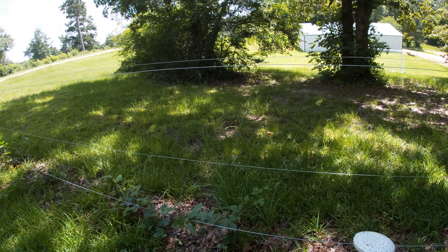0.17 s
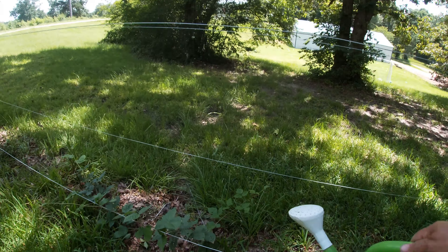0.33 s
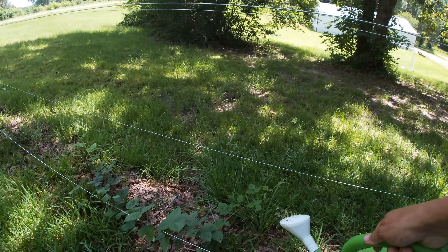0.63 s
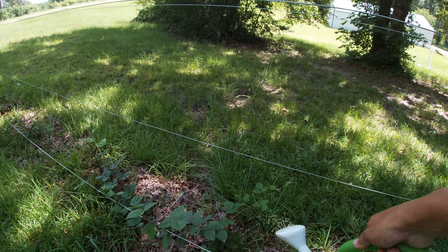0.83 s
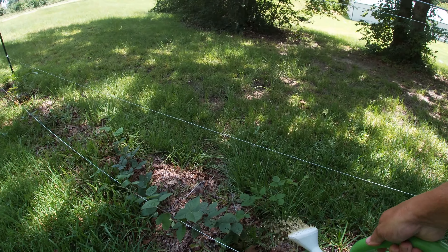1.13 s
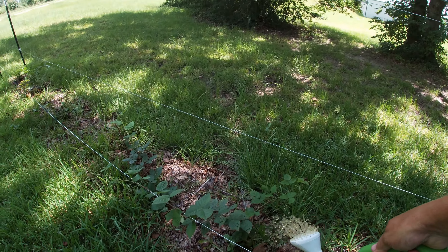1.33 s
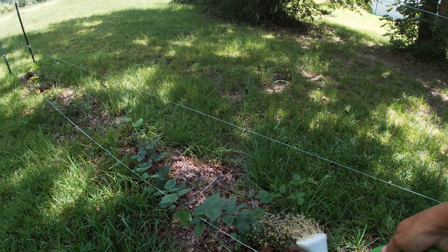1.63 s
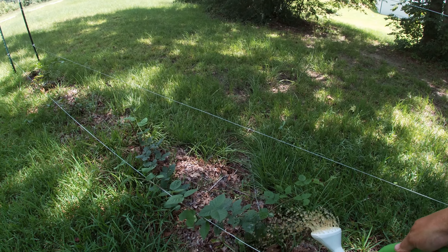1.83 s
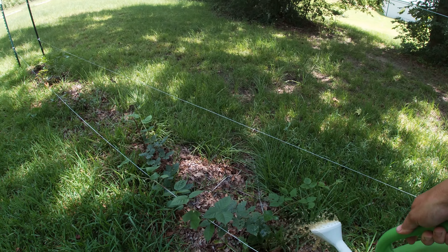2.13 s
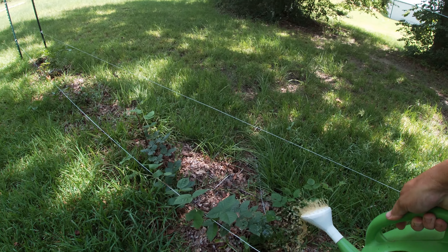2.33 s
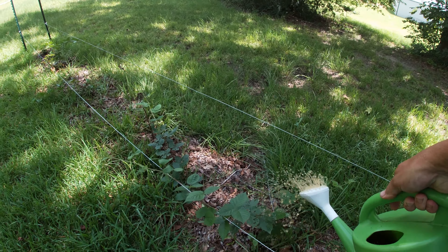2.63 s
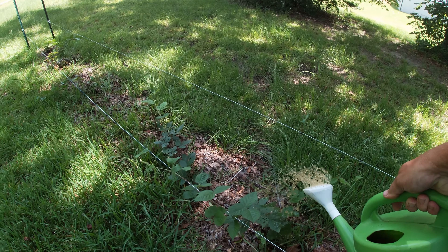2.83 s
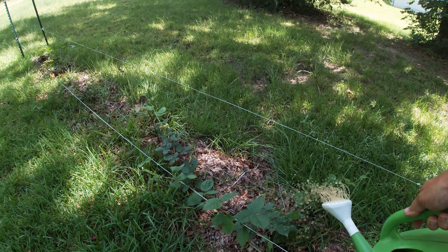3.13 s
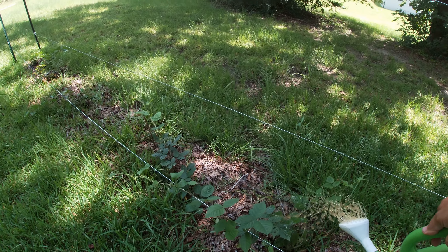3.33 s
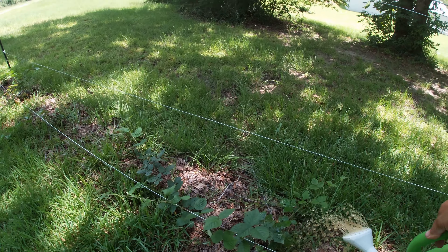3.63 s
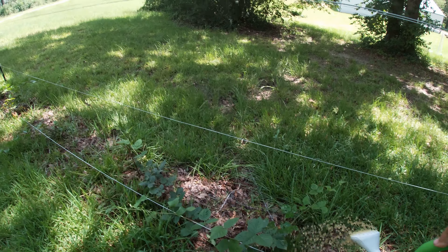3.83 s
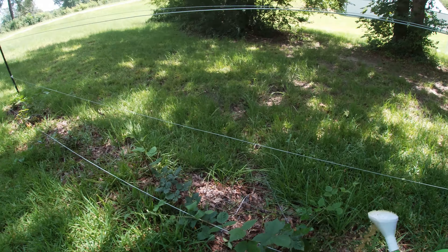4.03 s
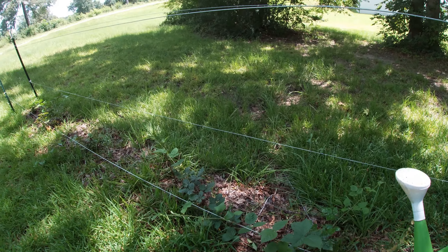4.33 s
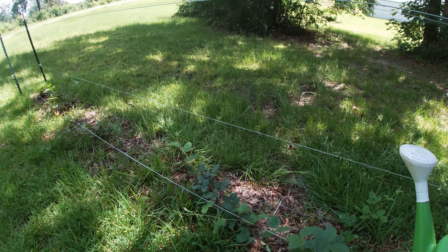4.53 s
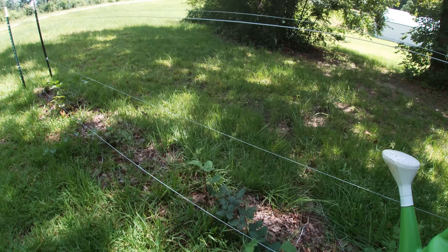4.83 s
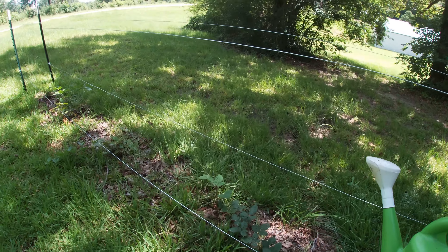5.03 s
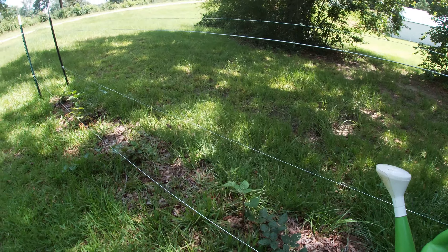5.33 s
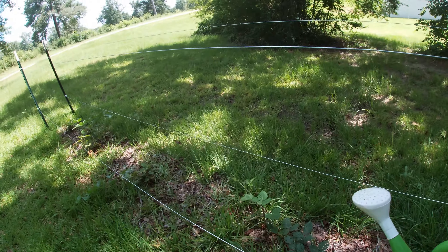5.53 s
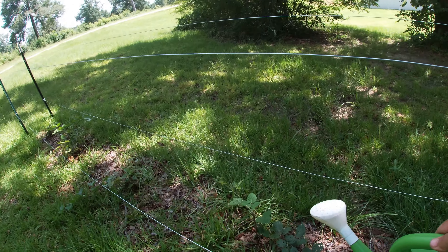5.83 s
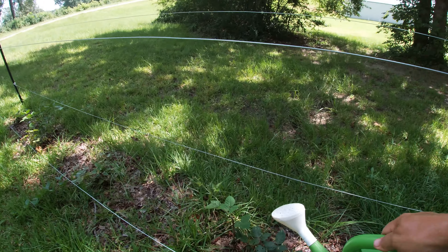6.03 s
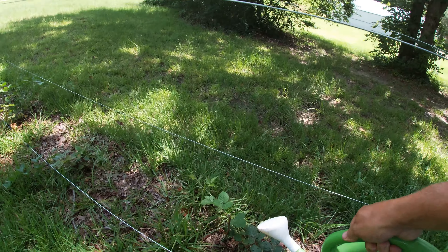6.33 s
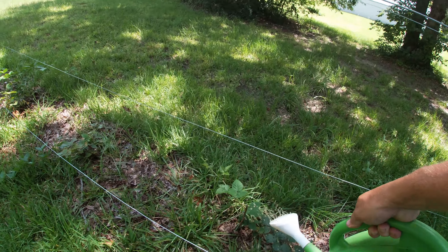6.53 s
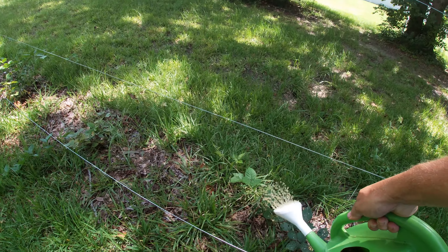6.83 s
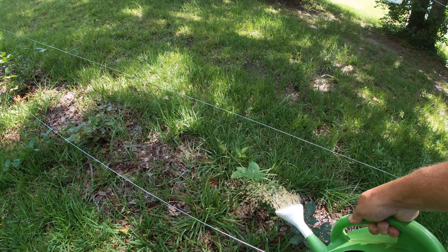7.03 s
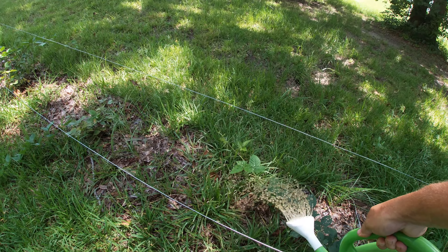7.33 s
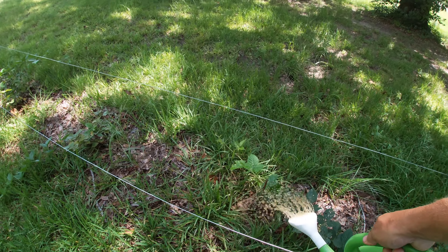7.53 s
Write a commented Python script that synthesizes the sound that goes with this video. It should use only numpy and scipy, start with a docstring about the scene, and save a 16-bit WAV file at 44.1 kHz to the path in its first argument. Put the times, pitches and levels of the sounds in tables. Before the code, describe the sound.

A plastic watering can patters water over grass and leaves with hollow gurgles, sloshes loudly when tipped upright, then knocks and pours again over a distant engine.

```python
"""A breeze, a distant engine and the summer hiss of a garden last throughout, as noise and sine orders.
First a plastic can sprinkles grass and low plants, in random impacts; air gurgles in as ringing bubbles.
At 4.6 s the can is tipped upright: the wet plastic squeaks, and waves boom and splash inside it.
At 5.5 s a gust of shaped noise buffets the microphone, then a small bird chirps a rising sine.
At 6.2 s knocks ring the can wall as it is tipped again, and the pouring and gurgling resume."""
import sys
import numpy as np
from scipy import signal
from scipy.fft import rfft, irfft
from scipy.io import wavfile
from scipy.ndimage import uniform_filter1d

SR = 44100
rng = np.random.default_rng(int(sys.argv[2]) if len(sys.argv) > 2 else 0)


def pcm_store(signal):
    """Save signal as 16-bit PCM."""
    levels = np.round(np.clip(np.atleast_2d(signal), -1, 1) * 32767)
    wavfile.write(sys.argv[1], SR, levels.astype(np.int16).T)


N = 338688
TIME = np.arange(N) / SR

# Every *_COLOUR table is a relative spectrum: frequency_hz, level_db.
# puffs of wind on the microphone: peak_s, level_db, swell_s, decay_s, corner_hz, fall_db_per_octave
PUFFS = [(0.013, -37, .01, 0.012, 40.3, 41), (1.36, -43, .025, .035, 40.2, 31),
         (5.362, -29, 0.013, 0.15, 89.5, 9), (5.462, -11, 0.0056, 0.016, 195, 12),
         (5.484, -15.5, 0.011, 0.056, 138, 15.5), (5.549, -12.5, 0.0046, 0.01, 185, 19.5),
         (5.586, -16, 0.026, 0.012, 160, 23.5), (5.712, -19.5, 0.0083, 0.02, 172, 17),
         (5.748, -15.5, 0.013, 0.018, 94, 16.5)]
BREEZE_COLOUR = [(10, 0), (25, -11), (48, 2), (80, -16), (200, -25), (600, -84)]
BREEZE_DB, BREEZE_SWING_DB = -62.5, 0.5   # the light breeze between puffs
GUST_S, GUST_DB, GUST_SWELL_S, GUST_DECAY_S = 5.5, -33, 0.045, 0.13   # the gust that carries the puffs
# level of the distant engine: time_s, level_db
ENGINE_LEVEL = [(0, -53), (.9, -65.5), (1.5, -54.5), (2.65, -52), (4.4, -49.5), (5.2, -56.5), (6.6, -55),
                (7.68, -52.5)]
# sine components of the engine: multiple_of_firing_rate, relative_level_db
ENGINE_ORDERS = [(1, -2.5), (1.601, -10.5), (2, -14.5), (3, -17.5), (4, -20)]
ENGINE_RUMBLE_COLOUR = [(30, -27), (60, -5), (80, -1), (105, -7.5), (160, -2.5), (230, -7), (400, -15),
                        (1200, -51)]
FIRING_HZ = 75.4
# still garden air, insects and far leaves
GARDEN_COLOUR = [(20, -5), (80, -12), (170, 2.5), (240, -24.5), (360, -15.5), (700, -15), (1100, -16.5),
                 (1320, -14), (1950, -45.5), (2600, -17.5), (4000, -14.5), (6500, -16.5), (8700, -25.5),
                 (9800, -21), (11000, -37), (15500, -82)]
GARDEN_DB = -54

# strength of the shower from the rose in each pour: time_s, level_db
FIRST_POUR = [(0.65, -60), (0.76, -62.5), (1.01, -51.5), (1.32, -60.5), (1.33, -50.5), (2.46, -52),
              (3.08, -48.5), (3.19, -44), (3.5, -54), (3.8, -47), (4.51, -53), (4.55, -50)]
SECOND_POUR = [(6.26, -93), (6.55, -66), (6.896, -57.5), (6.912, -52), (7.018, -55), (7.184, -53),
               (7.68, -50.5)]
# the rose dribbles beneath and between the pours: time_s, level_db
DRIBBLE = [(0.7, -73), (5.6, -69), (6.05, -61), (6.27, -71)]
# where the shower lands: time_s, share_on_broad_leaves (0-1)
AIM = [(1.0, 0.35), (1.4, 0.64), (2.6, 0.3), (2.9, 0.93), (3.35, 0.9), (3.7, 0.3), (6.7, 0.16), (7.0, 0.9),
       (7.68, 0.77)]
# drops on grass, broad leaves and soil
GRASS_COLOUR = [(900, -35), (1500, -7.5), (2000, -7.5), (2520, -5.5), (2950, -6.5), (4000, -5), (5000, -15),
                (7000, -11), (9000, -13.5), (9900, -9.5), (11200, -27.5), (12500, -21), (14500, -28),
                (15700, -84)]
LEAVES_COLOUR = [(1500, -13.5), (2900, -30), (3300, -3.5), (3900, 0.5), (4600, 2.5), (5200, 6.5), (6200, 5),
                 (7200, -8), (8000, -5), (8800, 1), (10000, -13.5), (11300, -25), (12400, -13),
                 (15500, -42)]
SOIL_COLOUR = [(150, -7), (300, -4.5), (750, 2.5), (1150, -5.5), (1700, 2), (2000, -2.5), (2400, 3.5),
               (2850, -4), (3600, -28), (6000, -31.5)]
# leaves that ring under the drops: pitch_hz, width_hz, relative_level_db
LEAF_MODES = [(1720, 300, -6), (2390, 510, 4.5), (3280, 120, -2), (4430, 360, -31), (5020, 270, 7.5),
              (5470, 130, -3.5), (5170, 990, 6), (8900, 350, 3.5), (9100, 1000, 4)]
FULL_FLOW_DB = -48.5   # a steady pour
SOIL_DB = -51   # splash on open soil at full flow
SOIL_FOLLOWS, LEAF_SHELTER_DB = 0.77, 1.5   # power of the flow; loss when all lands on leaves
# the clearest tiny bubbles on wet leaves: start_s, level_db, pitch_hz
TINKLES = [(0.208, -31.5, 4900), (0.857, -39, 5200), (1.094, -46, 5240), (1.116, -33, 5060),
           (1.299, -37, 5460), (1.36, -37, 5960), (1.412, -40, 5700), (1.462, -35, 5600)]
# further tinkles at random: rate, level above the flow before its spread, middle pitch
TINKLES_PER_S, TINKLE_DB, TINKLE_HZ = 11, 12.5, 5230

# air glugs into the can in swells: middle_s, length_s, bubbles_db, hollow_boom_db
GLUGS = [(0.337, 0.32, -54.5, -54.5), (0.586, 0.28, -77, -48.5), (0.828, 0.07, -56.5, -58),
         (1.034, 0.17, -55.5, -45), (1.257, 0.05, -72, -45), (1.474, 0.17, -54, -45.5),
         (1.683, 0.078, -57, -48), (1.904, 0.13, -54, -51), (2.26, 0.16, -76, -51.5),
         (2.465, 0.032, -52.5, -59), (3.772, 0.046, -52, -50.5), (3.92, 0.14, -53, -58.5),
         (4.246, 0.074, -52.5, -54), (6.762, 0.18, -55.5, -61), (7.023, 0.13, -55.5, -46.5),
         (7.125, 0.049, -55, -57), (7.19, 0.054, -50.5, -47), (7.37, 0.15, -53, -58),
         (7.603, 0.26, -75, -56)]
# resonances of the air inside the can, one list for each tilt: pitch_hz, width_hz, relative_level_db
CAN_AIR = [
    [(171, 22.4, 7), (272, 37, -5)],
    [(192.6, 11, 4), (257, 30, 0.5), (301.6, 8.9, 0)],
]
BUBBLE_COLOUR = [(300, -10.5), (520, -3), (760, -0.5), (880, -1.5), (1020, -0.5), (1250, 0), (1380, -2.5),
                 (1600, 6), (1900, -9), (2500, -4), (4000, -50)]
SETTLED_S = 6.0   # from here on the can is held at its second tilt
# a dry crackle right at the microphone: peak_s, level_db, swell_s, decay_s
CRACKLE = [(0.2424, -19.5, 0.00026, 0.00034), (0.2552, -23, 0.00024, 0.0003),
           (0.263, -31.5, 0.0089, 0.0015), (0.2654, -17, 0.0013, 0.00066), (0.266, -25, 0.00096, .0003)]
CRACKLE_COLOUR = [(120, -11), (200, -6), (2200, 1.5), (3890, -1), (4340, 2), (8400, -2.5), (10100, 1),
                  (11900, -8), (14000, 2), (16000, -14)]
# single bubbles and plinks: start_s, level_db, pitch_hz
PLINKS = [(0.472, -34.5, 4780), (.817, -38, 2300), (0.857, -43, 1180), (.899, -36, 985), (0.976, -41, 920),
          (0.992, -41, 1500), (1.012, -38, 1260), (1.025, -36.5, 1570), (1.048, -40, 1120),
          (1.09, -42, 1090), (1.137, -42, 1460), (1.455, -33.5, 1510), (1.461, -41, 760),
          (1.472, -34, 1515), (1.515, -34.5, 1505), (1.545, -43, 745), (1.562, -42, 560), (1.642, -40, 590),
          (3.897, -35, 735), (4.175, -33.5, 1210), (4.191, -25, 1650), (4.213, -37, 2600),
          (4.359, -31, 2550), (4.361, -37, 3200), (4.75, -27.5, 1840), (4.8, -31, 460), (4.869, -38, 2840),
          (6.655, -41.5, 1490), (6.755, -37.5, 1450), (6.768, -45, 2160), (6.775, -44, 1030),
          (6.798, -40, 3250), (6.8, -38, 1540), (6.831, -37, 1255), (6.834, -39.5, 960), (6.915, -48, 1040),
          (6.93, -47, 1700), (6.985, -44, 745), (7.02, -37, 713), (7.081, -44, 1500), (7.112, -47, 683),
          (7.143, -43, 630), (7.163, -44, 1040), (7.166, -38, 1620), (7.175, -40, 755), (7.189, -37, 1060),
          (7.194, -36, 1660), (7.213, -48, 990), (7.284, -43, 1190), (7.308, -39, 1720), (7.33, -44, 1800),
          (7.373, -35.5, 1544), (7.376, -42, 780), (7.395, -38, 650), (7.414, -40, 2100),
          (7.425, -41.5, 608), (7.459, -38, 1630)]
PLINK_T60_S, PLINK_SHORTENING = 0.053, 0.43   # ring of a 1 kHz bubble; it falls with this power of pitch
# soft airy hisses swell and fade: middle_s, length_s, level_db
AIRY_HISSES = [(0.547, .14, -47.5), (5.283, 0.46, -48.5)]
AIRY_HISS_COLOUR = [(700, -6), (1500, -10), (2360, -9.5), (7580, -12.5), (15000, -37)]
# single fat drops on leaves: start_s, level_db, pitch_hz
DROPS = [(0.711, -37.5, 1200), (1.106, -27, 2210), (1.179, -40, 3000), (1.254, -31.5, 1700),
         (1.332, -30, 2460), (1.443, -29, 5500), (1.503, -28, 1910), (1.936, -33, 1500), (2.078, -38, 2000),
         (2.211, -24, 2220), (2.375, -33.5, 5900), (2.459, -30, 2000), (2.526, -32.5, 5470),
         (2.578, -33, 5450), (2.596, -30, 4780), (2.606, -31, 5600), (2.691, -32, 5540), (2.71, -33, 4350),
         (2.755, -38, 5260), (2.776, -44, 1700), (2.883, -30.5, 5130), (3.11, -32, 5050),
         (3.167, -32, 5000), (3.263, -30, 5030), (3.29, -30, 5080), (3.318, -28.5, 3320),
         (3.752, -33, 3500), (3.777, -30, 2420), (3.977, -32, 2170), (3.991, -30.5, 2100),
         (4.034, -30, 6900), (4.06, -25, 4460), (4.291, -37, 2200), (6.937, -37, 3940)]
# the stream spits a clump of water: start_s, low_splash_db, bright_spatter_db
SPURTS = [(0.769, -49, -59), (1.238, -48, -49), (1.458, -44.5, -44), (1.553, -49, -47), (2.706, -72, -51),
          (6.908, -43.5, -41), (6.935, -55, -43), (7.087, -48, -62), (7.156, -48, -44.5), (7.171, -51, -45),
          (7.195, -55, -45), (7.289, -47, -45), (7.373, -51, -38), (7.46, -57, -46), (7.514, -47.5, -40)]
SPURT_COLOUR = [(400, -15), (700, 10.5), (1000, 3), (1600, 4.5), (2200, -12), (4000, -58)]

# the wet plastic scrapes as the can comes upright: middle_s, length_s, level_db, pitch_hz
SQUEAKS = [(4.581, 0.01, -42, 4580), (4.618, 0.025, -53, 1900), (4.666, 0.02, -43, 2570),
           (4.667, 0.041, -46, 8430), (4.689, 0.017, -40.5, 3480), (4.716, 0.028, -39, 1260),
           (4.717, 0.022, -45, 3770), (4.725, 0.016, -39.5, 2610), (4.782, 0.012, -40, 2450),
           (4.826, 0.06, -37, 1684)]
SQUEAK_RISE_PER_S = 1.3   # share by which a squeak's pitch climbs
# waves slapping inside the can: start_s, boom_db, overtones_db, splash_db, spray_db, fall_by_40_db_s
SLAPS = [(4.591, -24.5, -34, -36, -41.5, 0.28), (4.633, -20, -20.5, -35.5, -32, 0.063),
         (4.648, -33, -19.5, -41, -43, 0.17), (4.677, -23, -30, -51, -41, 0.28),
         (4.705, -41, -34, -39.5, -56, .1), (4.748, -47, -47, -37, -31, 0.1),
         (4.764, -16.5, -36, -37, -42, 0.12), (4.865, -17.5, -16.5, -25.5, -42, 0.063)]
# overtones of the slapped air: multiple_of_boom_pitch, relative_level_db, t60_s
BOOM_OVERTONES = [(1.42, -7, 0.14), (1.85, -11.5, 0.15), (2.4, -7, 0.053)]
SPLASH_COLOUR = [(180, -15), (300, 6.5), (380, -1), (429, 0), (502, -7), (710, -8), (840, -6), (1240, 2),
                 (1420, -10), (1680, -2), (2240, -12), (2520, -18), (3200, -3.5), (4160, -55), (7040, -120)]
SPRAY_COLOUR = [(1410, -14), (2400, -1.5), (2630, 6), (2930, -20), (3420, 3), (4230, 1), (4860, 3),
                (6500, -6.5), (8380, -5), (11600, -23), (15000, -59)]
BOOM_HZ = 178.6   # the air above the water, can upright
BOOM_T60_S, BOOM_RISE_HZ_PER_S = 0.22, 50   # the boom hangs on and rises as the water runs back
# water churns between the slaps
CHURN_S, CHURN_LENGTH_S = 4.74, 0.33   # middle, length
CHURN_DB, CHURN_BOOM_DB, CHURN_SPRAY_DB = -47, -42, -53.5
SETTLE_T60_S = 0.65   # the hollow hums on while the water settles
# the handle clicks as the can is lifted: start_s, level_db
HANDLE_CLICKS = [(4.5848, -31), (4.5898, -28.5), (4.866, -40)]
# modes of the hollow handle: pitch_hz, relative_level_db, t60_s
HANDLE_MODES = [(925, -0.5, 0.04), (2820, -1, 0.042), (5190, -0.5, 0.035)]
# a small bird chirps once, far off
CHIRP_S, CHIRP_DB, CHIRP_HZ, CHIRP_RISE_HZ_PER_S = 5.788, -37.5, 4420, 9000
CHIRP_SWELL_S, CHIRP_DECAY_S, CHIRP_LENGTH_S = 0.0016, 0.017, 0.03   # the pitch rises over the length
# the can knocks as it is tipped again: start_s, level_db, contact_softness_hz
KNOCKS = [(6.1834, -28, 5000), (6.1919, -33.5, 4000), (6.1956, -46, 500), (6.204, -42, 900)]
# modes of the plastic wall: pitch_hz, relative_level_db, t60_s
CAN_WALL_MODES = [(228, -3.5, 0.098), (333, -3.5, 0.11), (674, 4, 0.072), (816, 4.5, 0.02),
                  (1030, -13, 0.052), (1170, -10, 0.048), (1630, -12, 0.044), (1710, -20, 0.063),
                  (2170, -11, 0.026), (2600, -7, 0.033), (3250, -9, 0.014), (4040, -9, 0.038)]
CUTOFF_HZ = 15800


def from_db(db):
    """Logarithmic level: decibels to amplitude gain."""
    return 10 ** (np.asarray(db) / 20)


def rms_one(x):
    """Normalization: scale to rms 1."""
    return x / np.sqrt(np.mean(x ** 2) + 1e-20)


def evened(x, size):
    """Level compression: hold rms 1 over stretches of so many samples."""
    return x / np.sqrt(np.abs(uniform_filter1d(x ** 2, size=size)) + 1e-12)


def in_time(rows):
    """Linear interpolation: each column of a curve at every sample."""
    s, *columns = np.transpose(rows)
    return [np.interp(TIME, s, c) for c in columns]


def passband(x, hz, kind, order=2):
    """Band limiting by a Butterworth filter."""
    sos = signal.butter(order, np.clip(hz, 10, 0.45 * SR), kind, fs=SR, output="sos")
    return signal.sosfilt(sos, x + 1e-18)


def coloured(x, spectrum, size=8192):
    """Minimum-phase filtering: a causal response with the given spectrum, from its cepstrum; rms 1."""
    hz, db = np.transpose(spectrum)
    grid = np.maximum(np.arange(size // 2 + 1) * SR / size, 1)
    gain = from_db(np.interp(np.log(grid), np.log(hz), db))
    cepstrum = irfft(np.log(gain))
    # fold the anticausal half onto the causal one
    cepstrum[1:size // 2] *= 2
    cepstrum[size // 2 + 1:] = 0
    response = irfft(np.exp(rfft(cepstrum)))
    return rms_one(signal.fftconvolve(x, response)[:N])


def drift(rate):
    """Low-passed chance: slow random variation with spread 1, made at 1/40 of the sample rate."""
    r = np.exp(-80 * np.pi * rate / SR)
    chance = rng.standard_normal(N // 40 + 2002)
    slow = signal.lfilter([1], [1, -2 * r, r * r], chance)[2000:]
    return np.interp(np.arange(N) / 40, np.arange(len(slow)), rms_one(slow))


def ring(clicks, hz, t60):
    """Damped resonance: a unit click sets a dying sine of initial height 1 ringing."""
    r, w = from_db(-60 / (t60 * SR)), 2 * np.pi * hz / SR
    return signal.lfilter([0, np.sin(w)], [1, -2 * r * np.cos(w), r * r], clicks + 1e-18)


def t60_of(width_hz):
    """Bandwidth and damping: a narrower resonance rings longer."""
    return np.log(1000) / np.pi / width_hz


def ring_modes(contacts, modes):
    """Modal superposition: contacts ring every mode of a body, with alternating signs."""
    return sum((-1) ** k * from_db(db) * ring(contacts, hz, t60) for k, (hz, db, t60) in enumerate(modes))


def click(s, db):
    """Ideal impulse: a single sample."""
    return from_db(db) * (np.arange(N) == round(s * SR))


def burst(s, swell, decay):
    """Exponential envelope: grows up to a moment and dies after it."""
    return np.exp(np.maximum(np.minimum((TIME - s) / swell, (s - TIME) / decay), -40))


def swell(s, length, squareness):
    """Generalized Gaussian envelope about a moment; a higher squareness flattens its top."""
    return np.exp(-np.minimum(np.abs(2 * (TIME - s) / length) ** squareness, 80) / 2)


def grains(per_s, spread_db, clump_db):
    """Random impact process: hits of uneven size and either sign arrive in clumps."""
    sizes = from_db(spread_db * np.minimum(rng.exponential(1, N), 5)) * rng.choice([-1, 1], N)
    return sizes * (rng.random(N) < per_s / SR) * from_db(clump_db * drift(24.0))


def wind():
    """Turbulent pressure: breeze, gust and puffs are low noise; each puff has its own corner frequency."""
    breeze = from_db(BREEZE_DB + BREEZE_SWING_DB * drift(1.9))
    gust = from_db(GUST_DB) * burst(GUST_S, GUST_SWELL_S, GUST_DECAY_S)
    out = (breeze + gust) * coloured(rng.standard_normal(N), BREEZE_COLOUR)
    for s, db, swell_s, decay_s, corner_hz, fall_db in PUFFS:
        # three octaves above the corner the fall has acted three times
        spectrum = [(10, -4), (26, 4), (corner_hz, -2), (8 * corner_hz, -2 - 3 * fall_db), (SR / 2, -110)]
        eddies = coloured(rng.standard_normal(N), spectrum)
        out = out + from_db(db) * burst(s, swell_s, decay_s) * evened(eddies, size=900)
    return out


def engine(waver=0.00605, throb_db=2.5):
    """Harmonic synthesis: the lowest engine orders waver in pitch and level over a dull rumble."""
    turns = np.cumsum(FIRING_HZ * (1 + waver * drift(1.73))) / SR
    hum = 0
    for k, db in ENGINE_ORDERS:
        tone = np.sin(2 * np.pi * (k * turns + rng.random()))
        hum = hum + from_db(db + throb_db * drift(1.8)) * tone
    rumble = from_db(-4.0) * coloured(rng.standard_normal(N), ENGINE_RUMBLE_COLOUR)
    return from_db(in_time(ENGINE_LEVEL)[0]) * (np.sqrt(2) * hum + rumble)


def garden():
    """Diffuse background: many far sources merge into steady coloured noise."""
    return from_db(GARDEN_DB) * coloured(rng.standard_normal(N), GARDEN_COLOUR)


def flow():
    """Energy addition: the gain of pours and dribble together at every moment."""
    pours = np.vstack([FIRST_POUR, SECOND_POUR])
    return np.hypot(from_db(in_time(pours)[0]), from_db(in_time(DRIBBLE)[0]))


def blades(cycles=11, tilt_db=0.5):
    """Impact excitation: droplets tick on blades of varied pitch; tilt in dB an octave, then a band; rms 1."""
    hits = grains(per_s=420, spread_db=3.0, clump_db=0.0)
    pitches = np.geomspace(1700, 9500, 20)
    dealt = rng.integers(0, len(pitches), N)
    ticks = 0
    for k, hz in enumerate(pitches):
        tick = rms_one(ring(hits * (dealt == k), hz, cycles / hz))
        ticks = ticks + from_db(tilt_db * np.log2(hz / pitches[0])) * tick
    return evened(passband(ticks, [1300, 10000], "band", order=4), size=7000)


def shower():
    """Superposed impacts: drops tick on grass, ring broad leaves and splash on soil; the flow drives all."""
    pouring = flow()
    share = np.clip(in_time(AIM)[0], 0, 1)
    fat = evened(grains(per_s=170, spread_db=3.0, clump_db=2.5), size=7000)   # heavier drops, in every layer
    fat = fat * np.minimum(from_db(FULL_FLOW_DB - 3.0) / pouring, 1)   # a harder pour makes them no louder
    clumps = from_db(2.7 * drift(84))   # the jets break up unevenly
    fine = [rms_one(clumps * grains(per_s=7000, spread_db=0.5, clump_db=3.5)) for _ in range(3)]
    grass = coloured(fine[0] + from_db(-13.0) * fat, GRASS_COLOUR)
    soil = coloured(fine[1] + from_db(-1.0) * fat, SOIL_COLOUR)
    rings = 0
    for hz, width, db in LEAF_MODES:
        hits = clumps * grains(per_s=280, spread_db=4.5, clump_db=1.4)
        rings = rings + from_db(db) * rms_one(ring(hits, hz, t60_of(width)))
    rings = rms_one(passband(rings, [2000, 10000], "band"))
    leaves = rms_one(coloured(fine[2] + from_db(-4.0) * fat, LEAVES_COLOUR) + rings)
    # square roots share out the energy between grass and leaves
    patter = from_db(-0.5) * np.sqrt(1 - share) * grass
    patter = patter + from_db(0.3) * np.sqrt(share) * leaves + from_db(-8.5) * blades()
    soaking = from_db(SOIL_DB - LEAF_SHELTER_DB * share)
    soaking = soaking * (pouring / from_db(FULL_FLOW_DB)) ** SOIL_FOLLOWS
    return pouring * patter + soaking * soil


def tinkles(t60=0.018, rise_per_s=26, spread_db=1.5, pitch_spread=0.066):
    """Bubble resonance: tiny trapped bubbles ring briefly and rise in pitch; random ones follow the flow."""
    out, t, pouring = np.zeros(N + SR), TIME[:SR // 20], flow()
    shape = (1 - np.exp(-t / 0.0012)) * np.exp(-np.log(1000) * t / t60)
    bubbles = [(round(s * SR), from_db(db), hz) for s, db, hz in TINKLES]
    for when, size, pitch in rng.random((round(TINKLES_PER_S * N / SR), 3)):
        # a uniform draw stretched to a standard deviation of pitch_spread
        hz = TINKLE_HZ * np.exp(pitch_spread * (2 * pitch - 1) * np.sqrt(3))
        start = int(when * N)
        gain = pouring[start] * from_db(TINKLE_DB + spread_db * (2 * size + 1))
        bubbles.append((start, gain, hz))
    for start, gain, hz in bubbles:
        out[start:start + len(t)] += gain * shape * np.sin(2 * np.pi * hz * t * (1 + rise_per_s * t / 2))
    return out[:N]


def hollow(pops, resonances, sway=0.04):
    """Cavity resonance: pops ring the air above the water; its pitch sways as the water rocks; rms 1."""
    air = sum(from_db(db) * rms_one(ring(pops, hz, t60_of(width))) for hz, width, db in resonances)
    swayed_time = np.cumsum(1 + sway * drift(3.96)) / SR % (N / SR)
    swaying = np.interp(swayed_time, TIME, air)
    return evened(passband(swaying, 160, "high", order=4), size=1800)


def gurgle():
    """Coupled resonance: air enters as ringing bubbles, and their pops make the hollow above the water boom."""
    pops = grains(per_s=600, spread_db=0.3, clump_db=4.5)
    bursts = grains(per_s=520, spread_db=1.0, clump_db=-1.0)   # the bubbles big enough to ring
    pitches = np.geomspace(400, 2600, 24)
    dealt = rng.integers(0, len(pitches), N)
    cycles = 30   # each bubble's t60 in periods
    rings = rms_one(sum(ring(bursts * (dealt == k), hz, cycles / hz) for k, hz in enumerate(pitches)))
    bubbles = coloured(evened(rings, size=4000) + from_db(-6.5) * rms_one(pops), BUBBLE_COLOUR)
    bubbling = booming = 0
    for s, length, bubbles_db, boom_db in GLUGS:
        shape = swell(s, length, squareness=1.85)
        bubbling = bubbling + from_db(bubbles_db) * shape
        booming = booming + from_db(boom_db) * shape
    first, second = [hollow(pops, resonances) for resonances in CAN_AIR]
    return bubbling * bubbles + booming * np.where(TIME < SETTLED_S, first, second)


def crackle():
    """Transient noise: brief envelopes cut coloured noise into tiny snaps and a short rasp."""
    shape = sum(from_db(db) * burst(s, swell_s, decay_s) for s, db, swell_s, decay_s in CRACKLE)
    return shape * coloured(rng.standard_normal(N), CRACKLE_COLOUR)


def plinks(rise=0.033, onset_s=0.0015, rough=0.55):
    """Bubble resonance: a wobbling sine rises as the bubble nears the surface; small ones die sooner."""
    out = np.zeros(N)
    wobble = rough * drift(270)
    for s, db, hz in PLINKS:
        t60 = PLINK_T60_S * (1000 / hz) ** PLINK_SHORTENING
        start = round(s * SR)
        t = TIME[:min(SR // 5, N - start)]
        span = slice(start, start + len(t))
        shape = (1 - np.exp(-t / onset_s)) * np.exp(-np.log(1000) * t / t60)
        out[span] += from_db(db) * shape * np.sin(2 * np.pi * hz * t * (1 + rise * t / t60) + wobble[span])
    return out


def airy_hisses():
    """Dense random impacts merge into a fine, even hiss that swells and fades."""
    shape = sum(from_db(db) * swell(s, length, squareness=4.1) for s, length, db in AIRY_HISSES)
    return shape * coloured(grains(per_s=7600, spread_db=-1.0, clump_db=1.5), AIRY_HISS_COLOUR)


def drops(spatter_span=2.0, tick_span=2.1):
    """Impact and response: a fat drop gives a tick, a very short leaf ring and spatter about one pitch."""
    hiss = rng.standard_normal(N)
    ticks = rings = spatter = 0
    for s, db, hz in DROPS:
        hit = click(s, db)
        tick = passband(hit, [hz / tick_span, hz * tick_span], "band", order=1)
        ticks = ticks + tick * np.sqrt(SR / 2 / hz)   # offsets the narrower band of low ticks
        rings = rings + ring(hit, hz, 0.0058)
        spray = rms_one(passband(hiss, [hz / spatter_span, hz * spatter_span], "band", order=1))
        spatter = spatter + from_db(db) * burst(s + 0.0013, 0.00035, 0.0018) * spray
    soft = passband(from_db(-7.0) * ticks + from_db(-7.0) * spatter, 7800, "low", order=4)
    return soft + from_db(-1.0) * rings


def spurts():
    """Clustered impacts: a clump of drops lands within milliseconds, a low splash under bright spatter."""
    low = sum(from_db(low_db) * burst(s + 0.0045, 0.0014, 0.021) for s, low_db, _ in SPURTS)
    bright = sum(from_db(bright_db) * burst(s + 0.0014, 0.0023, 0.011) for s, _, bright_db in SPURTS)
    splash = coloured(grains(per_s=1500, spread_db=0.5, clump_db=4.0), SPURT_COLOUR)
    spatter = coloured(grains(per_s=2500, spread_db=1.0, clump_db=2.5), LEAVES_COLOUR)
    return low * splash + bright * spatter


def squeaks(rasp=0.048, stutter_db=4.0):
    """Stick-slip friction: wet plastic makes short, rough tones that stutter unevenly and rise a little."""
    roughness, out = 1 + rasp * drift(330), 0
    for s, length, db, hz in SQUEAKS:
        near = np.abs(TIME - s) < 2 * length
        pitch = hz * (1 + SQUEAK_RISE_PER_S * (TIME[near] - s)) * roughness[near]
        tone = np.zeros(N)
        tone[near] = np.sin(2 * np.pi * np.cumsum(pitch) / SR)
        out = out + from_db(db) * swell(s, length, squareness=3.3) * tone
    return from_db(stutter_db * drift(120)) * out


def slosh():
    """Cavity excitation: waves make the can's air boom, tap its wall and break into splash and spray."""
    churn = swell(CHURN_S, CHURN_LENGTH_S, squareness=5.3)
    settle = burst(CHURN_S + CHURN_LENGTH_S / 2, 0.01, SETTLE_T60_S / np.log(1000))
    # the envelopes add as energy, so they are squared here and rooted below
    booming = (from_db(CHURN_BOOM_DB) * np.maximum(churn, settle)) ** 2
    splashing = (from_db(CHURN_DB) * churn) ** 2
    spraying = (from_db(CHURN_SPRAY_DB) * churn) ** 2
    boom = taps = 0
    for s, boom_db, overtones_db, splash_db, spray_db, fall_s in SLAPS:
        press = 1 - burst(s, 1, 0.0044)   # the wave takes a few milliseconds to land
        hit = click(s, overtones_db)
        overtones = sum(from_db(db) * ring(hit, k * BOOM_HZ, t60) for k, db, t60 in BOOM_OVERTONES)
        boom = boom + press * overtones
        dying = burst(s, 1, BOOM_T60_S / np.log(1000))
        booming = booming + (from_db(boom_db) * press * dying) ** 2 * (TIME > s)
        taps = taps + click(s + 0.00093, splash_db)
        shape = burst(s + 0.003, 0.0015, fall_s / np.log(100))
        splashing = splashing + (from_db(splash_db) * shape) ** 2
        spraying = spraying + (from_db(spray_db) * shape) ** 2
    rise = BOOM_RISE_HZ_PER_S * np.clip(TIME - CHURN_S, -CHURN_LENGTH_S, CHURN_LENGTH_S)
    pitch = (BOOM_HZ + rise) * (1 + 0.04 * drift(24.7))
    tone = np.sin(2 * np.pi * np.cumsum(pitch) / SR)
    boom = boom + np.sqrt(booming) * from_db(1.8 * drift(40)) * tone
    wall = ring_modes(taps, CAN_WALL_MODES)
    cycles, froth = 36, 0   # each froth bubble's t60 in periods
    for hz in np.geomspace(450, 8500, 28):
        froth = froth + ring(grains(per_s=70, spread_db=2.0, clump_db=1.0), hz, cycles / hz) * np.sqrt(hz)
    froth = rms_one(froth)
    coarse = rms_one(grains(per_s=2000, spread_db=1.5, clump_db=-2.0))
    fine = rms_one(grains(per_s=2000, spread_db=0.0, clump_db=2.5))
    splash = evened(coloured(coarse + from_db(-1.5) * froth, SPLASH_COLOUR), size=1100)
    spray = evened(coloured(fine + from_db(-4.5) * froth, SPRAY_COLOUR), size=3000)
    flicker = from_db(2.0 * drift(47))   # a wave breaks unevenly
    water = flicker * (np.sqrt(splashing) * splash + np.sqrt(spraying) * spray)
    return passband(boom, 130, "high") + from_db(-12.0) * wall + water


def handle():
    """Modal ringing: clicks excite the hollow handle briefly as the grip shifts."""
    return ring_modes(sum(click(s, db) for s, db in HANDLE_CLICKS), HANDLE_MODES)


def chirp(rasp=0.12):
    """Frequency modulation: a short upward whistle made raspy by fast random pitch."""
    hz = CHIRP_HZ + CHIRP_RISE_HZ_PER_S * np.clip(TIME - CHIRP_S, 0, CHIRP_LENGTH_S)
    phase = 2 * np.pi * np.cumsum(hz * (1 + rasp * drift(427))) / SR
    return from_db(CHIRP_DB) * burst(CHIRP_S, CHIRP_SWELL_S, CHIRP_DECAY_S) * np.sin(phase)


def knock():
    """Modal ringing and friction: a few quick, scuffing contacts excite the plastic wall."""
    contacts = sum(passband(click(s, db), hz, "low", order=1) for s, db, hz in KNOCKS)
    wall = ring_modes(contacts, CAN_WALL_MODES)
    rubbing = sum(from_db(db) * burst(s + 0.00086, 0.0062, 0.012) for s, db, _ in KNOCKS)
    scuff = rms_one(passband(rng.standard_normal(N), [400, 3200], "band"))
    return passband(from_db(-4.0) * wall + from_db(-14.5) * rubbing * scuff, 5500, "low", order=4)


def scene():
    """Free-field superposition: everything is outdoors, so the sources add without reverberation."""
    surroundings = wind() + engine() + garden() + crackle() + airy_hisses() + chirp()
    pouring = shower() + tinkles() + gurgle() + plinks() + drops() + spurts()
    handling = squeaks() + slosh() + handle() + knock()
    return (surroundings + pouring + handling)[None]


def record(dry):
    """Band limitation: an elliptic low-pass cuts the top steeply."""
    return signal.sosfilt(signal.ellip(10, 0.2, 80, CUTOFF_HZ, fs=SR, output="sos"), dry)


dry = scene()
out = record(dry)
pcm_store(out)
```